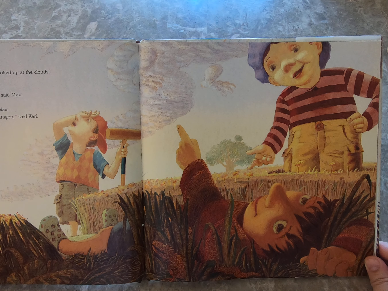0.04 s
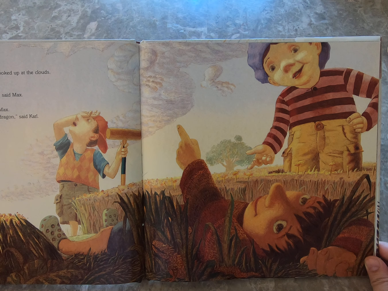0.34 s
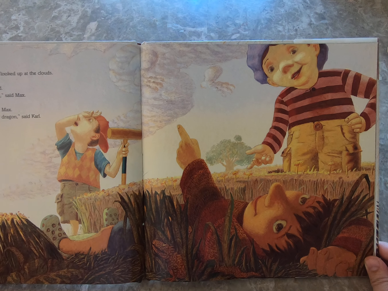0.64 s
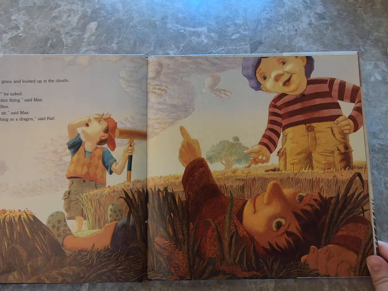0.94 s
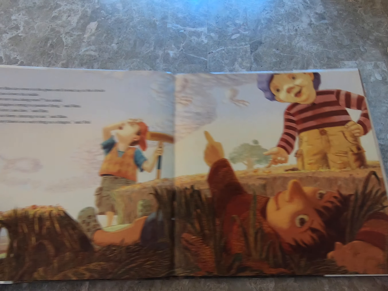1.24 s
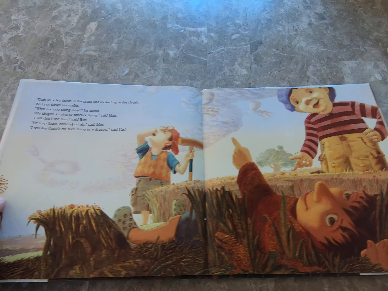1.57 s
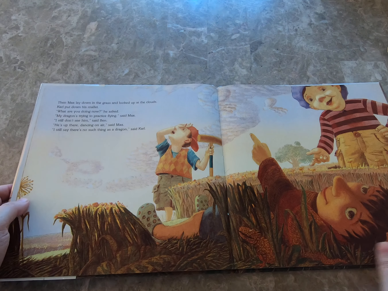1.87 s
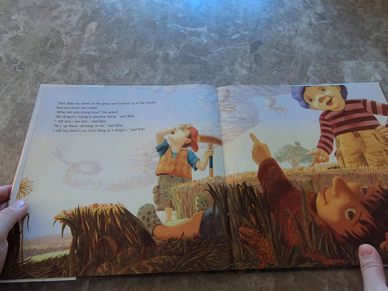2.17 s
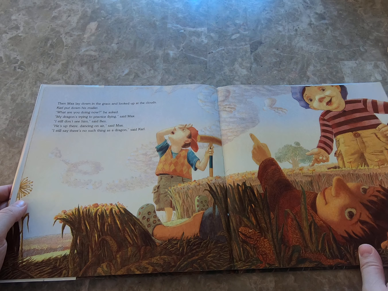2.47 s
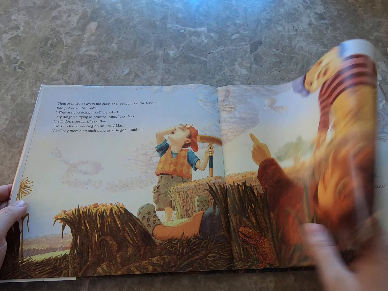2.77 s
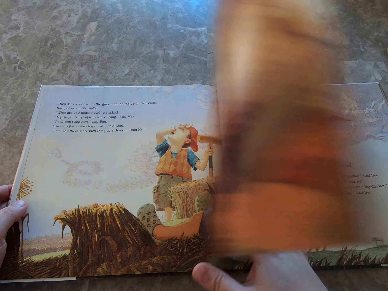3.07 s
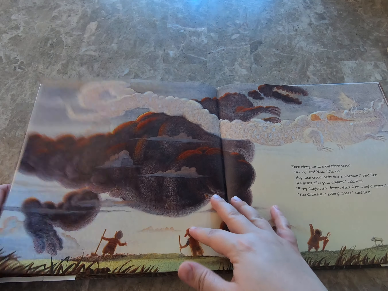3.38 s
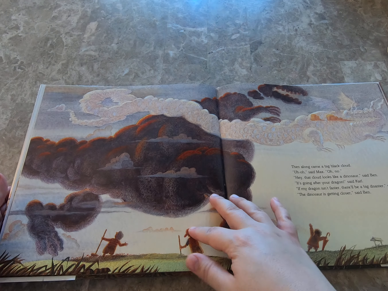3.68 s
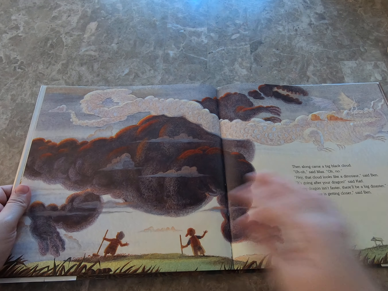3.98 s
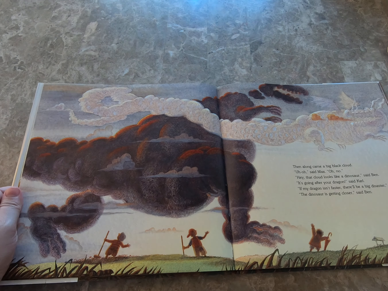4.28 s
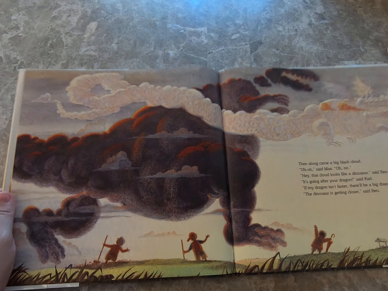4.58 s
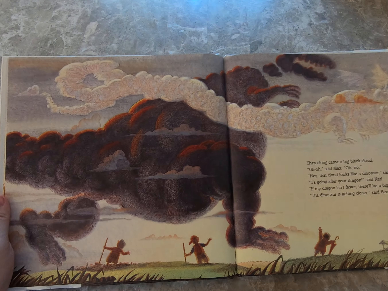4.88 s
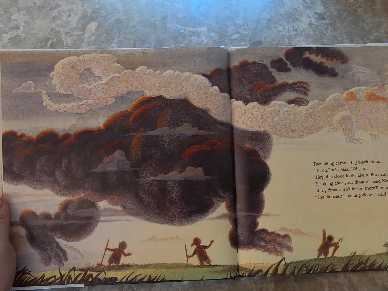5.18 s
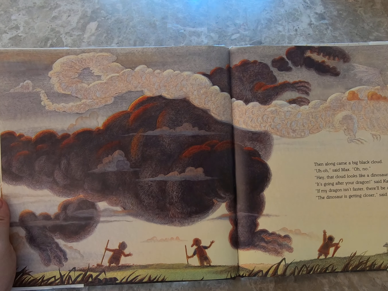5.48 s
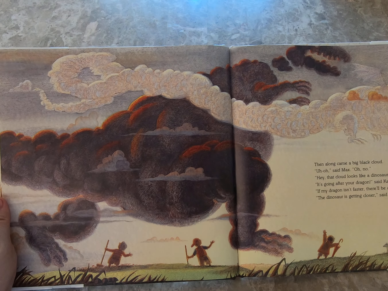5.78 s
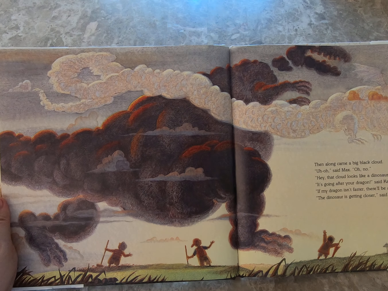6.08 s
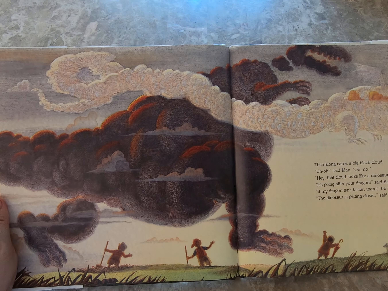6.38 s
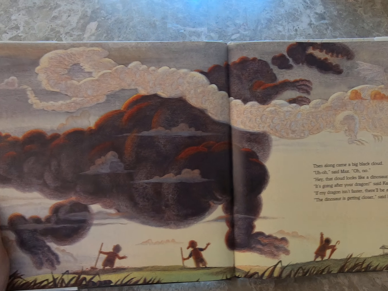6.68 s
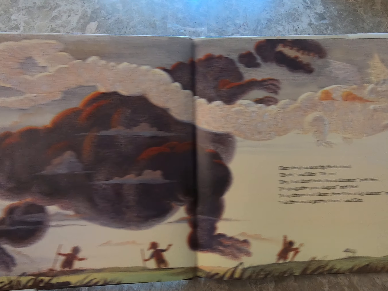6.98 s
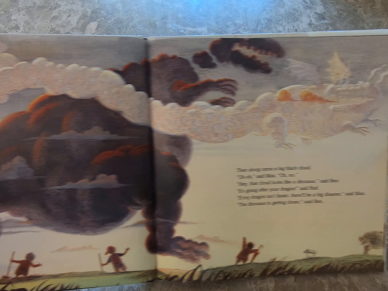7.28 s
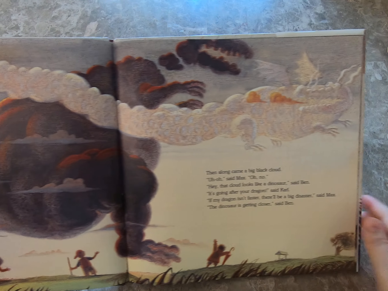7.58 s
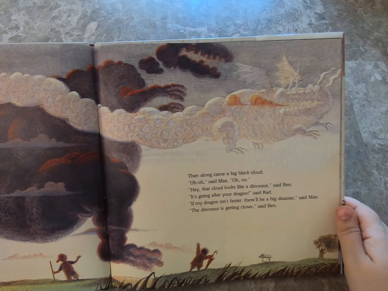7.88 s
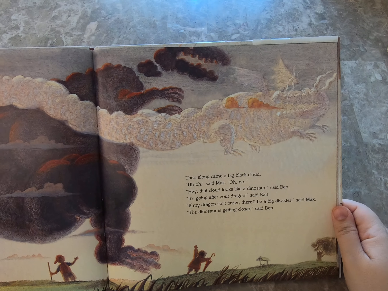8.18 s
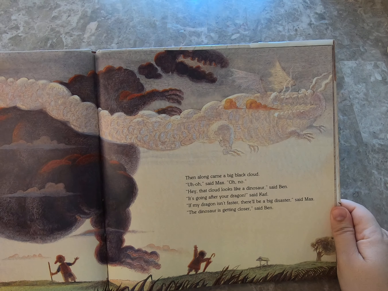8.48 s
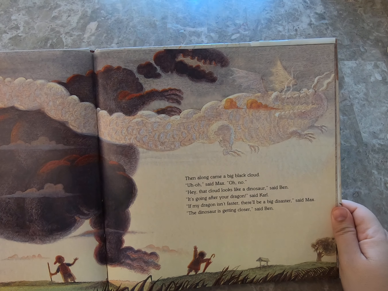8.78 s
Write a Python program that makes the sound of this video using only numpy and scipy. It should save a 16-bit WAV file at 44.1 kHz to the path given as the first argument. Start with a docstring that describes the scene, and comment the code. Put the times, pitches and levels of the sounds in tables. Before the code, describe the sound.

A hardcover book is pushed across a hard table with a soft scrape and small ticks from its binding. One stiff page lifts, snaps as it buckles, sweeps over with a puff of air and lands. Fingers pat and smooth it. After a few light clicks, the book is pulled back in one long scrape. The sounds are close, in a small, quiet room with a faint ventilation drone.

```python
"""A large hardcover picture book lies open on a hard table in a small, quiet room; ventilation drones.
At 1 s a hand pushes it to the right: the cover scrapes in countless tiny slips, and the binding ticks.
Near 3 s one stiff page lifts, snaps as it buckles, sweeps over with a puff of air and lands.
Fingers pat and smooth it. From 6.7 s the book is pulled back left in one long scrape."""
import sys
import numpy as np
from scipy import signal
from scipy.fft import rfft, irfft
from scipy.io import wavfile
from scipy.ndimage import uniform_filter1d

SR = 44100
rng = np.random.default_rng(int(sys.argv[2]) if len(sys.argv) > 2 else 0)


def inscribe(sig):
    """Save sig as 16-bit PCM at rate SR to the path in sys.argv[1].

    A 1-D sig is mono; a 2-D sig holds one channel per row.
    Samples are clipped to [-1, 1] before scaling.
    """
    pcm = np.round(np.clip(np.atleast_2d(sig).T, -1, 1) * 32767)
    wavfile.write(sys.argv[1], SR, pcm.astype(np.int16))


N = 389844
TIME = np.arange(N) / SR
TOP_HZ = 15100


def gain(db):
    """Turn decibels into a number to multiply by."""
    return 10 ** (np.asarray(db) / 20)


def unit(x):
    """Scale a sound to an average strength (rms) of 1."""
    return x / np.sqrt(np.mean(x ** 2))


def pitches(size):
    """The frequencies in a spectrum, kept above zero."""
    return np.maximum(np.fft.rfftfreq(size, 1 / SR), 1)


def curve(points, hz):
    """Join (pitch_hz, value) points with lines, octaves evenly spaced."""
    point_hz, value = np.transpose(points)
    return np.interp(np.log(hz), np.log(point_hz), value)


def hump(hz, centre_hz, width_hz):
    """A smooth peak of height 1 around one pitch."""
    return 1 / (1 + (2 * (hz - centre_hz) / width_hz) ** 2)


def ring_curve(rings, hz):
    """Add up rings (pitch_hz, width_hz, boost_db); a negative boost is a dip."""
    return sum(db * hump(hz, centre_hz, width_hz) for centre_hz, width_hz, db in rings)


def filtered(x, gains):
    """Turn each frequency up or down by its own gain."""
    return irfft(rfft(x) * gains, x.shape[-1])


def ring_after(gains):
    """Make a filter ring only after a hit, never before it (minimum phase)."""
    cepstrum = irfft(np.log(gains + 1e-9))
    half = cepstrum.shape[-1] // 2
    cepstrum[..., 1:half] *= 2
    cepstrum[..., half + 1:] = 0
    return np.exp(rfft(cepstrum))


def pan(left_db):
    """Two gains that make the left side left_db louder than the right."""
    return gain(np.array([[1], [-1]]) * left_db / 2)


def wander(per_s, size=N):
    """A smooth random wobble, about 1 in size."""
    step = max(int(SR / per_s), 2)
    levels = np.repeat(rng.standard_normal(size // step + 1), step)
    return unit(uniform_filter1d(uniform_filter1d(levels, step), step)[:size])


def envelope(age, rise_s, hold_s, fade_s):
    """Pressure rises evenly, holds, then dies away."""
    return np.minimum(age / rise_s, 1) * np.exp(-np.maximum(age - rise_s - hold_s, 0) / fade_s)


def add(out, start_s, sound):
    """Mix a sound in at its start time."""
    start = int(start_s * SR)
    out[:, start:start + sound.shape[-1]] += sound[:, :N - start]


# How wide the book sounds (0 is very wide): pitch_hz, width_db
BOOK_WIDTH = [(100, -16), (1200, -9.5), (3000, -19.5), (5500, -5.5), (8000, -0.5), (15000, 0)]
def spread(shared, difference, hz, widths=BOOK_WIDTH):
    """Make left and right spectra: a wide sheet sends different treble to each side."""
    width = gain(curve(widths, hz))
    return (shared + np.array([[1], [-1]]) * width * difference) / np.sqrt(1 + width ** 2)


def noise(gains, widths=BOOK_WIDTH):
    """Stereo hiss with a gain for each frequency."""
    size = 2 * (len(gains) - 1)
    white = rfft(rng.standard_normal((2, size)))
    return unit(irfft(spread(*white, pitches(size), widths) * gains, size))


# The tone of the moving air: pitch_hz, level_db
AIR_TONE = [(25, -35.5), (90, -31.5), (124, -35.5), (146, -17.5), (170, -13.5), (186, -19), (204, -19),
            (260, -29.5), (370, -36), (560, -40.5), (790, -29.5), (1100, -39.5), (1400, -38), (2200, -48.5),
            (5000, -57), (10000, -62.5), (15000, -74)]
# The drone is near the middle, the hiss comes off the walls: pitch_hz, width_db
AIR_SPREAD = [(200, -6.5), (700, 1), (4000, -1)]
def ventilation(level_db=-59.5, waver_db=1.45):
    """Moving air makes a low, wavering drone under a thin, steady hiss."""
    hz = pitches(N)
    air = noise(gain(curve(AIR_TONE, hz)), AIR_SPREAD) * gain(level_db)
    drone = filtered(air, 1 / (1 + (hz / 300) ** 8))
    return air + drone * (gain(waver_db * wander(per_s=9)) - 1)


# How long the echo takes to fall by 60 dB: pitch_hz, echo_s
ECHO_TIMES = [(200, 0.2), (1000, .36), (4000, 0.26), (12000, 0.032)]
def room(x, echo_db, delay_s, size=22050):
    """The walls add a blurred echo, different on each side and shortest in the high treble."""
    age, hz = TIME[:size], pitches(size)
    centres = np.log([pitch_hz for pitch_hz, _ in ECHO_TIMES])
    tail = 0
    for weights, (_, echo_s) in zip(np.eye(len(centres)), ECHO_TIMES):
        band = np.interp(np.log(hz), centres, weights)
        hiss = filtered(rng.standard_normal((2, size)), np.sqrt(band))
        tail = tail + hiss * gain(-60 * age / echo_s)
    tail = unit(tail * np.clip(age / delay_s - .5, 0, 1)) / np.sqrt(size)
    echo = signal.fftconvolve(x.mean(axis=0)[None], tail, axes=1)[:, :N]
    return x + gain(echo_db) * echo


# Rings and dips of the open book: pitch_hz, width_hz, boost_db
BOOK_RINGS = [(467, 220, -8.5), (714, 200, 7.5), (1282, 91, 3.5), (1840, 390, 1)]
def book_tone(hz):
    """The open book boosts some pitches and swallows others, in dB."""
    return ring_curve(BOOK_RINGS, hz)


def crackle(pitch_hz, low_slope, high_slope, length_ms, peak_db, top_db, rings=(), size=4096):
    """One short burst; bigger patches of paper sound lower. Slopes are dB lost per octave."""
    hz, age = pitches(size), TIME[:size]
    length_s = max(length_ms, .3) / 1000
    rise_s = 0.001 + length_s ** 2 / 0.015  # longer crumples swell more slowly
    # Fibres break with unequal force.
    fibres = rng.standard_normal((2, size)) * gain(3.5 * rng.standard_normal(size))
    burst = rfft(fibres * np.exp(-age / (0.77 * length_s)) * (1 - np.exp(-age / rise_s)))
    power = uniform_filter1d(np.abs(burst) ** 2, size=72)
    burst = burst * ring_after(power ** -.5)  # even out the tone before shaping it
    ratio = (hz / pitch_hz) ** 4
    fall_db = (low_slope * np.log2(1 + 1 / ratio) + high_slope * np.log2(1 + ratio)) / 4
    patch_db = peak_db * hump(hz, pitch_hz, 0.38 * pitch_hz) - fall_db
    book_db = book_tone(hz) + ring_curve(rings, hz) + top_db * (hz / TOP_HZ) ** 2
    return unit(irfft(spread(*burst, hz) * ring_after(gain(book_db + patch_db)))) / np.sqrt(size)


def broad_ring(hz, db):
    """One wide ring of a struck patch."""
    return (hz, 0.19 * hz, db)


def tiny_slips(per_s, scatter_db, hiss, size):
    """Fibres catch and let go: uneven clicks over a smooth hiss."""
    strengths = gain(scatter_db * np.minimum(rng.exponential(size=size), 5))
    clicks = (rng.random(size) < per_s / SR) * strengths * rng.choice([-1, 1], (2, size))
    return unit(clicks) + hiss * rng.standard_normal((2, size))


def rub(slips, tone_db, body_db, fizz_db, sheen_db):
    """Rubbing: pressure brings out the low body, speed the high fizz and the even higher sheen."""
    hz = pitches(slips.shape[-1])
    spectrum = spread(*rfft(slips), hz) * gain(tone_db)
    body = 1 / (1 + (hz / 900) ** 8)
    fizz = 1 / (1 + (5000 / hz) ** 8)
    sheen = 1 / (1 + (10500 / hz) ** 24)
    bands = ((body, body_db), (1 - body - fizz, 0), (fizz - sheen, fizz_db),
             (sheen, sheen_db + 1.9 * fizz_db))  # sheen grows faster than fizz
    return sum(unit(irfft(spectrum * band)) * gain(db) for band, db in bands)


CATCH_SCATTER_DB, CATCH_SCATTER_OCTAVES = 3.5, .35
# Spells of small catches: start_s, end_s, catches_per_s, level_db, pitch_hz
CATCH_SPELLS = [(1.203, 1.6, 26, -32, 3150), (1.649, 1.98, 30.7, -29.5, 804),
                (4.189, 4.55, 40, -39.5, 3160)]
def small_catches(count=16):
    """The dragging cover and creeping fingertips catch at uneven times, strengths and pitches."""
    out = np.zeros((2, N))
    for start_s, end_s, per_s, level_db, pitch_hz in CATCH_SPELLS:
        for k, (lag, strength, shift) in enumerate(rng.uniform(-1, 1, (count, 3))):
            catch_s = start_s + (k + (1 + lag) / 2) / per_s
            catch = crackle(pitch_hz * 2 ** (CATCH_SCATTER_OCTAVES * shift),
                            low_slope=14, high_slope=17, length_ms=2.6, peak_db=-3, top_db=-15)
            if catch_s < end_s:
                add(out, catch_s, catch * gain(level_db + CATCH_SCATTER_DB * strength))
    return out


def tick(pitch_hz, low_slope, top_db, rings=()):
    """One tick of the stiff cover: a smaller patch sounds higher and dies sooner."""
    khz = pitch_hz / 1000
    own_ring = (pitch_hz, .12 * pitch_hz, 5)
    return crackle(pitch_hz, low_slope, high_slope=6.3 * khz ** 0.17, length_ms=2.3 / khz ** 0.34,
                   peak_db=1.5, top_db=top_db, rings=[own_ring, *rings])


# Ticks and knocks of the cover, binding and creeping fingertips: start_s, relative_db, pitch_hz,
# low_slope_db_per_octave, left_db, ring_hz, ring_db
TICKS_AND_KNOCKS = [(1.151, -29.5, 610, -2, 5, 1240, 11), (1.392, -23, 4210, 12, 1, 3200, 4),
                    (1.434, -25.5, 2010, 14, 8, 1090, 10), (1.623, -26, 755, 9, -2, 754, 11),
                    (1.835, -20.5, 870, 5, -4, 1500, 7), (1.936, -12, 3480, 4, 3.5, 4300, 5.5),
                    (1.9377, -15, 850, 4, 2, 770, -1), (1.9941, -21.5, 3000, 1.5, 2, 5500, 5),
                    (2.2504, -36, 4100, 10.5, 2, 5500, 7), (3.6104, -26, 4140, 5, -1, 2980, 6),
                    (3.6603, -26, 3280, 1.5, 5, 5170, 8), (4.1136, -30.5, 4970, 1.5, 3, 1800, 10),
                    (4.171, -29, 1800, 2, 2, 1690, 6), (4.398, -29, 3320, 2, 5, 1500, 10),
                    (4.426, -30.5, 1100, 8, -2, 1350, 8), (4.453, -32.5, 1260, 5, -3, 5600, 21),
                    (4.6416, -22, 3880, 1.5, 1, 5300, 5), (6.589, -26.5, 3470, 8.5, 3, 1570, 7),
                    (6.7024, -25.5, 3100, 0, 3, 4200, 2), (6.7364, -23.5, 4300, 3.5, 2, 5200, 11),
                    (8.0296, -25.5, 1610, 12, 4, 1100, 2), (8.1144, -29.5, 4240, 2.5, 1, 3100, 1),
                    (8.214, -31.5, 3250, 1.5, 7, 2920, 7.5)]
def ticks_and_knocks():
    """The cover and binding catch and tick as the book is moved; while it rests, creeping fingertips tick too."""
    out = np.zeros((2, N))
    for start_s, db, pitch_hz, low_slope, left_db, ring_hz, ring_db in TICKS_AND_KNOCKS:
        click = tick(pitch_hz, low_slope, top_db=-31, rings=[broad_ring(ring_hz, ring_db)])
        add(out, start_s, click * gain(db) * pan(left_db))
    return out


# The tone of rubbed paper: pitch_hz, level_db
PAPER_TONE = [(100, -23.5), (280, -5.5), (700, -15.5), (1300, -6.5), (2800, -5.5), (4500, -10),
              (7200, -7.5), (10000, -14), (15000, -30.5)]
def paper_tone(hz):
    """Rubbed paper is heard through the rings of the book, in dB."""
    return curve(PAPER_TONE, hz) + book_tone(hz)


# Sharp clicks of fingers or cover, each followed by a fading hiss: start_s, relative_db, pitch_hz,
# low_slope_db_per_octave, left_db, ring_hz, ring_db, dip_hz, hiss_db, fizz_db
SHARP_CLICKS = [(0.8835, -24.5, 2970, 17, -8, 7350, 11.5, 4600, -64, 5),
                (1.3439, -11, 3400, 10.5, -1, 4150, 4, 5700, -60.5, 7),
                (1.5031, -13.5, 4050, 11, -3, 3250, 7, 4520, -58, 0.5),
                (3.9824, -25.5, 4070, -1.5, 1, 4300, 7, 5300, -66.5, -5.5),
                (4.681, -22.5, 1400, 4.5, 2.5, 3500, 6, 5200, -65, -6.5),
                (4.8404, -24.5, 1700, 12, 2, 3700, 4, 5800, -64, -4),
                (4.9943, -23.5, 4300, 5, 1.5, 1630, 11, 3200, -62.5, 0),
                (5.13, -29, 2500, 5, 5.5, 1690, 13, 4000, -63, -14),
                (5.3051, -27, 3630, 2.5, -2, 1126, 12.5, 4300, -69.5, -7),
                (6.458, -22, 3705, 9, 3, 1560, 11, 2003, -63.5, 2)]
def sharp_clicks(creaks=3, creak_s=.02, creak_db=-18):
    """Fingers or cover click, brighter with more fizz; then the binding creaks in weaker catches."""
    out = np.zeros((2, N))
    for start_s, db, pitch_hz, low_slope, left_db, ring_hz, ring_db, dip_hz, _, fizz_db in SHARP_CLICKS:
        rings = [broad_ring(ring_hz, ring_db), (dip_hz, 0.063 * dip_hz, -5)]
        top_db = min(2.3 * fizz_db, -5)
        add(out, start_s, tick(pitch_hz, low_slope, top_db, rings) * gain(db) * pan(left_db))
        for k, (lag, strength, shift) in enumerate(rng.uniform(-0.9, 1, (creaks, 3)), start=1):
            catch = tick(pitch_hz * 2 ** (CATCH_SCATTER_OCTAVES * shift), low_slope, top_db)
            level = gain(db + creak_db + CATCH_SCATTER_DB * strength) / k
            add(out, start_s + creak_s * (k + lag / 2) / creaks, catch * level * pan(left_db))
    return out


def click_tails(size=32768):
    """A fading hiss follows each sharp click."""
    out, hz = np.zeros((2, N)), pitches(size)
    tone_db = paper_tone(hz) - 3 * (hz / TOP_HZ) ** 2  # a little duller than paper on paper
    fade = envelope(TIME[:size], rise_s=0.0014, hold_s=0.0081, fade_s=0.068)
    for start_s, *_, hiss_db, fizz_db in SHARP_CLICKS:
        slips = tiny_slips(per_s=1100, scatter_db=5, hiss=1.3, size=size)
        scrape = rub(slips, tone_db, body_db=-13.5, fizz_db=fizz_db, sheen_db=-8)
        shake_db = 2 * wander(per_s=52, size=size)
        add(out, start_s, scrape * fade * gain(hiss_db - shake_db))
    return out


# A knock's short ring, brief squeaks and fading hisses: start_s, level_db, fade_s, pitch_hz, width_hz
PITCHED_BURSTS = [(0.8841, -41, 0.0018, 1540, 300), (0.888, -64, 0.079, 3300, 600),
                  (0.887, -64, 0.054, 5400, 600), (0.886, -60, .06, 7350, 600),
                  (0.886, -57, 0.044, 8840, 600), (1.155, -57.5, 0.41, 3570, 550),
                  (2.922, -36.5, 0.018, 2890, 550), (3.53, -51.5, 0.03, 5000, 1000),
                  (6.461, -55, 0.055, 4110, 1300), (6.461, -64, 0.059, 12000, 4000)]
def pitched_bursts(size=32768):
    """Noise around one pitch swells and dies, heard as a knock's ring, a squeak or a fading hiss."""
    out, age = np.zeros((2, N)), TIME[:size]
    for start_s, level_db, fade_s, pitch_hz, width_hz in PITCHED_BURSTS:
        hiss = noise(hump(pitches(size), pitch_hz, width_hz))
        swell = np.exp(-age / fade_s) * (1 - np.exp(-20 * age / fade_s))
        add(out, start_s, hiss * gain(level_db) * swell)
    return out


def slide(move, tone_db, rings, slips, swell_db, sheen_db, shake_db, shakes_per_s):
    """One move of the book: it speeds up and slows down while its weight, rings and place shift."""
    start_s, rise_s, hold_s, fade_s, db, sag, body_from, body_to, fizz_db, left_from, left_to = move
    size = slips.shape[-1]
    out, age, hz = np.zeros((2, N)), TIME[:size], pitches(size)
    progress = np.minimum(age / (rise_s + hold_s + 3 * fade_s), 1)
    speed = np.maximum(np.sin(np.pi * progress), .1)
    body_db = body_from + (body_to - body_from) * progress
    fizz_db = fizz_db + 2.5 * np.log2(speed)
    start_rings = [(pitch, width, boost) for pitch, width, boost, _ in rings]
    end_rings = [(pitch, width, boost) for pitch, width, _, boost in rings]
    first = rub(slips, tone_db + ring_curve(start_rings, hz), body_db, fizz_db, sheen_db)
    last = rub(slips, tone_db + ring_curve(end_rings, hz), body_db, fizz_db, sheen_db)
    scrape = (first + (last - first) * progress) * envelope(age, rise_s, hold_s, fade_s)
    level_db = db - sag * age + swell_db * (speed - 1) + shake_db * wander(shakes_per_s, size)
    add(out, start_s, scrape * gain(level_db) * pan(left_from + (left_to - left_from) * progress))
    return out


def wavering(x, rings, waver_db=2):
    """As the contact with the table wanders, each ring of the cover swells and fades on its own."""
    spectrum, hz = rfft(x), pitches(N)
    for pitch_hz, width_hz, *boosts_db in rings:
        if max(boosts_db) > 0:
            band = irfft(spectrum * hump(hz, pitch_hz, width_hz), N)
            x = x + band * (gain(waver_db * wander(per_s=7)) - 1)
    return x


# The tone of the pushed cover: pitch_hz, level_db
PUSH_TONE = [(150, -17), (350, -10), (520, -16.5), (770, -10.5), (950, -11), (1600, 1), (2400, -2.5),
             (3000, -1), (3600, -1.5), (5000, -1), (7500, -5.5), (10000, -10.5), (15000, -23)]
# Its rings change as the weight shifts: pitch_hz, width_hz, start_boost_db, end_boost_db
PUSH_RINGS = [(810, 170, -5, 9.5), (1280, 89, 1.5, -3), (1540, 220, -10, 2), (1880, 160, 5, 1.5),
              (2360, 200, 8, -3), (2850, 300, 7, -1.5), (3230, 140, 1, 2.5), (3600, 500, 3, -2),
              (5400, 1900, -6.5, -1.5)]
# Two shoves: start_s, rise_s, hold_s, fade_s, relative_db, sag_db_per_s, start_body_db, end_body_db,
# full_speed_fizz_db, start_left_db, end_left_db
PUSH_MOVES = [(1.134, 0.04, 0.57, 0.15, -54, 3.5, -15.5, -8, -7, 3, -6.5),
              (1.615, 0.2, 0.11, 0.13, -55, -3, -13, 1.5, -4.5, -2.5, 0.5)]
def book_push(size=98304):
    """The cover scrapes unevenly over the table as the book is shoved right."""
    out, hz = np.zeros((2, N)), pitches(size)
    tone_db = curve(PUSH_TONE, hz) + book_tone(hz)
    for move in PUSH_MOVES:
        slips = tiny_slips(per_s=1500, scatter_db=2.5, hiss=1, size=size)
        out += slide(move, tone_db, PUSH_RINGS, slips,
                     swell_db=0.5, sheen_db=-4.5, shake_db=2, shakes_per_s=72)
    return wavering(out, PUSH_RINGS)


# The tone of the pulled cover: pitch_hz, level_db
PULL_TONE = [(200, -11), (380, 2), (520, -17), (850, -10.5), (1150, 1), (1480, -8.5), (1680, -3.5),
             (2050, -5), (2600, 2), (3700, -1.5), (6500, -9), (10000, -14), (15000, -26)]
# Its rings on the table: pitch_hz, width_hz, start_boost_db, end_boost_db
PULL_RINGS = [(1344, 100, 9.5, 11), (1670, 180, -1, 10), (2050, 210, -8, 2), (2380, 200, 3.5, -5),
              (2750, 290, -2, 5), (3000, 84, -1, 5), (3270, 110, 1, 4), (3650, 190, -2, 7)]
# A long pull and a short one, with the same columns as PUSH_MOVES
PULL_MOVES = [(6.7, 0.13, 1.104, 0.15, -51, 6.46, -10.5, -44, -4.5, .5, 1.5),
              (7.99, 0.0265, 0.1, 0.13, -62, 3.3, -19, -8, -7.5, 2, 0.21)]
def book_pull(size=98304):
    """The cover slides back smoothly with a faint ring, swelling with its speed."""
    out = np.zeros((2, N))
    tone_db = curve(PULL_TONE, pitches(size))
    for move in PULL_MOVES:
        slips = tiny_slips(per_s=2500, scatter_db=2, hiss=1.5, size=size)
        out += slide(move, tone_db, PULL_RINGS, slips,
                     swell_db=3.5, sheen_db=-6, shake_db=0.67, shakes_per_s=40)
    return wavering(out, PULL_RINGS)


# Air shoved by the page: peak_s, level_db, half_length_s
AIR_PUFFS = [(3.005, -45.5, 0.016), (3.284, -64, 0.027)]
def page_puffs(pitch_hz=194):
    """The swinging page pushes soft, low gusts at the microphone."""
    swell = sum(gain(db) * np.exp(-((TIME - peak_s) / half_s) ** 2) for peak_s, db, half_s in AIR_PUFFS)
    ratio = pitches(N) / pitch_hz
    return swell * noise(ratio ** 2 / (1 + ratio ** 4))


# Rings of the bent page: pitch_hz, width_hz, boost_db
PAGE_RINGS = [(430, 59, 8), (517, 76, 4.5), (603, 60, 3), (1090, 96, 0.5), (1620, 63, 2.5), (1998, 79, 5),
              (2930, 89, 0.5), (4330, 430, 2)]
# The hand takes hold; the page peels up, sweeps over and lands; fingers smooth it and grip again:
# start_s, rise_s, hold_s, fade_s, relative_db, body_db, fizz_db, left_db
PAGE_STROKES = [(0.917, 0.016, 0.35, .03, -63, -13, -40, 3),
                (2.469, 0.067, 0.13, .08, -61, -31, -15.5, -5.5),
                (2.606, 0.15, 0.02, 0.03, -42, -19, -4.5, -4),
                (2.758, 0.0089, 0.017, 0.064, -35, -23.5, -12, -2),
                (2.757, 0.075, 0.055, 0.081, -39.5, -18.5, -4.5, 0),
                (2.941, 0.059, 0.041, 0.05, -44, 2, -9.5, -0.5),
                (3.106, 0.075, 0.023, 0.17, -53.5, -6.5, -11.5, -3),
                (3.219, 0.017, 0.049, 0.085, -49.5, -0.5, -15.5, -1.5),
                (3.255, 0.035, 0.015, 0.048, -56.5, -20, -4.5, 1),
                (3.474, 0.0071, 0.014, 0.031, -50, -6, -10.5, -1),
                (3.508, 0.047, .01, 0.015, -53.5, -31, -4, -1),
                (3.616, 0.042, 0.009, 0.043, -64.5, -19, 0, -3.5),
                (4.094, 0.08, 0.18, 0.066, -67.5, -4.5, -8.5, -1),
                (4.386, 0.021, 0.052, 0.2, -64.5, -7, -2.5, -3),
                (6.021, 0.061, 0.54, 0.046, -83.5, 1, 6, -4), (6.598, 0.12, 0.048, .05, -60, -5.5, -17, 0),
                (8.322, 0.033, 0.053, 0.063, -67.5, -11, -22, 1)]
def page_rustles(trim_db=-3.5, size=32768):
    """The page drags over its neighbour and under the hand."""
    out, hz = np.zeros((2, N)), pitches(size)
    tone_db = paper_tone(hz) + ring_curve(PAGE_RINGS, hz)
    for start_s, rise_s, hold_s, fade_s, db, body_db, fizz_db, left_db in PAGE_STROKES:
        slips = tiny_slips(per_s=3200, scatter_db=1, hiss=0.51, size=size)
        scrape = rub(slips, tone_db, body_db, fizz_db, sheen_db=-6.5)
        shake_db = 1.5 * wander(per_s=130, size=size)
        pressure = envelope(TIME[:size], rise_s, hold_s, fade_s)
        add(out, start_s, scrape * pressure * gain(db + trim_db + shake_db) * pan(left_db))
    return out


# Fingers landing on the page: start_s, relative_db, length_ms, pitch_hz, left_db
FINGER_PATS = [(2.0875, -18.5, 3.6, 1290, -2), (3.478, -7, 3.4, 1550, 6), (3.483, -8.5, 5.6, 1480, 3)]
def finger_pats():
    """Fingers pat the page with a hollow tap."""
    out = np.zeros((2, N))
    for start_s, db, length_ms, pitch_hz, left_db in FINGER_PATS:
        pat = crackle(pitch_hz, low_slope=20.6, high_slope=21.4, length_ms=length_ms,
                      peak_db=4.5, top_db=16, rings=PAGE_RINGS)
        add(out, start_s, pat * gain(db) * pan(left_db))
    return out


# The page buckling: start_s, relative_db, pitch_hz, length_ms, left_db, ring_hz, ring_db
PAGE_SNAPS = [(2.6815, -18, 2528, 1.6, -9.5, 2700, 5), (2.7369, 4, 3800, 1.76, -6.5, 1430, 8),
              (2.7517, 2.5, 3400, 1.9, -6, 1170, 10.5), (2.7649, -4.5, 2700, 4.1, -4.5, 1700, 11),
              (2.8838, -6.5, 1800, 2.5, -7, 1000, 7), (2.935, -6, 2830, 6, -5, 2850, 7),
              (2.982, -5.5, 900, 13, -4, 1400, 4), (3.015, 4.5, 2050, 7.7, -4, 2900, 5.5),
              (3.0225, -1, 2390, 4, -5, 2150, -1), (3.0551, 0, 2400, 1.5, -3, 1647, 1),
              (3.1669, -7.5, 2220, 0.83, -1, 1300, 3), (3.2438, -3.5, 1240, 3.3, 1, 1770, 4),
              (3.2475, -10, 650, 6.4, 1, 660, 12), (3.283, -15.5, 620, 17, 2, 328, 5),
              (3.4103, -23.5, 3034, 2.6, -6, 3160, 6)]
def page_snaps():
    """The stiff page buckles in short, hollow snaps as it turns."""
    out = np.zeros((2, N))
    hollow = (5700, 1300, -6)  # a dip just above the page's rings
    for start_s, db, pitch_hz, length_ms, left_db, ring_hz, ring_db in PAGE_SNAPS:
        rings = [*PAGE_RINGS, hollow, broad_ring(ring_hz, ring_db)]
        snap = crackle(pitch_hz, low_slope=9.7, high_slope=12.3 * (pitch_hz / 1000) ** 0.5,
                       length_ms=length_ms, peak_db=0, top_db=-6.5, rings=rings)
        add(out, start_s, snap * gain(db) * pan(left_db))
    return out


def scene():
    """The book rubs and clicks in the room, over the ventilation."""
    noises = book_push() + book_pull() + page_rustles() + click_tails() + pitched_bursts() + page_puffs()
    page_clicks = gain(-2) * (page_snaps() + finger_pats())
    cover_clicks = gain(-0.9) * (ticks_and_knocks() + sharp_clicks())
    clicks = page_clicks + cover_clicks + small_catches()
    book = room(noises, echo_db=-10, delay_s=0.0048) + room(clicks, echo_db=-11, delay_s=0.0055)
    return book + ventilation()


# The two microphones hear the treble unequally: pitch_hz, left_db
MIC_SIDES = [(4500, 0.25), (6200, -2), (10000, -1), (12000, 4)]
def record(dry):
    """Each microphone dulls the highest treble in its own way; a filter cuts all above TOP_HZ."""
    hz = pitches(N)
    dull_db = -6 / (1 + (10540 / np.maximum(hz, 1000)) ** 30)
    heard = filtered(dry, gain(dull_db) * pan(curve(MIC_SIDES, hz)))
    top_cut = signal.ellip(8, .2, 70, TOP_HZ, fs=SR, output="sos")
    return signal.sosfilt(top_cut, heard)


dry = scene()
out = record(dry)
inscribe(out)
```